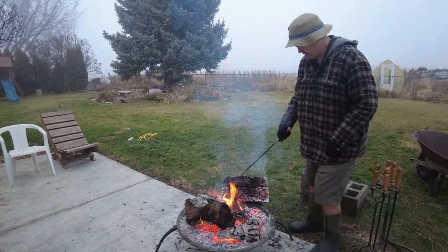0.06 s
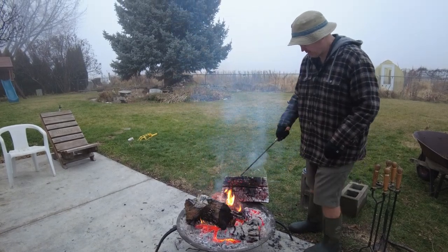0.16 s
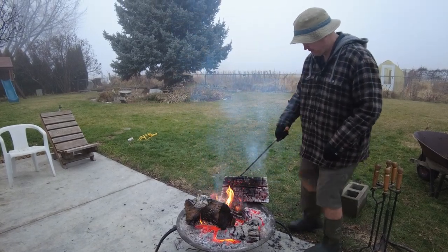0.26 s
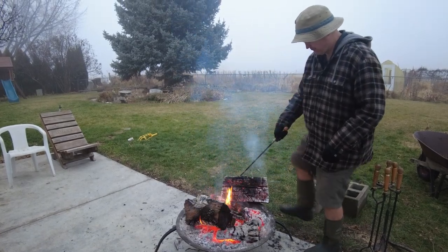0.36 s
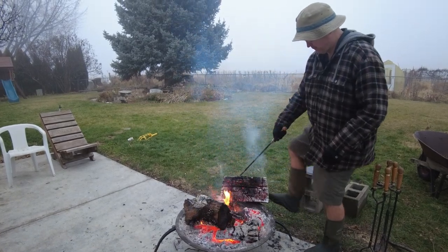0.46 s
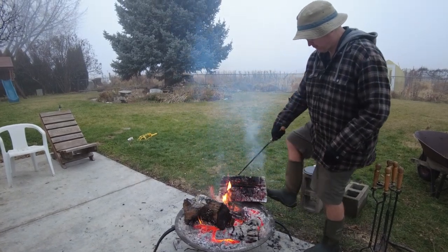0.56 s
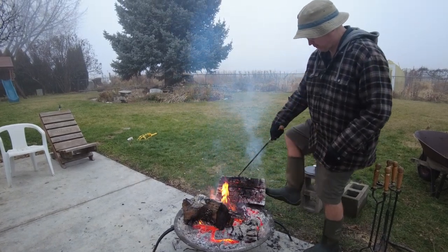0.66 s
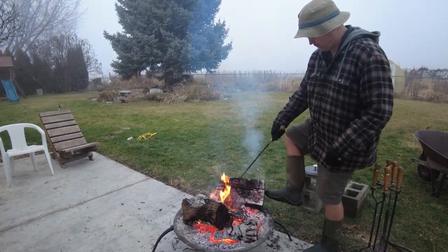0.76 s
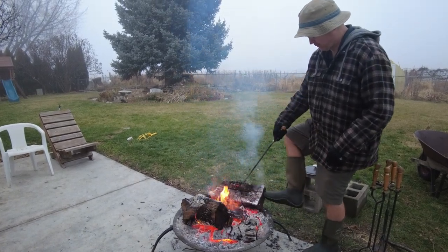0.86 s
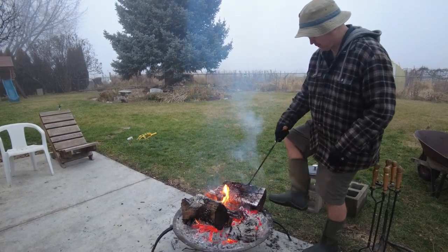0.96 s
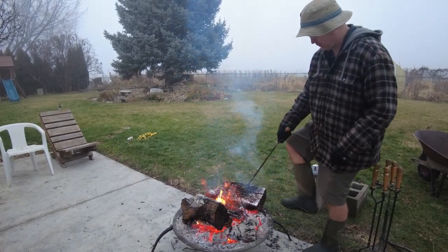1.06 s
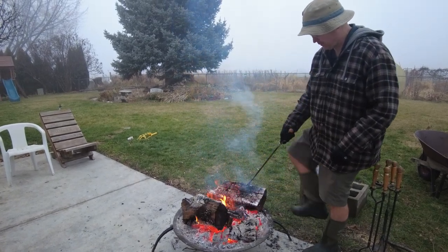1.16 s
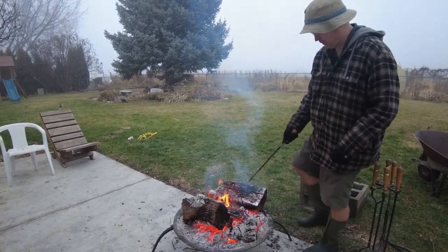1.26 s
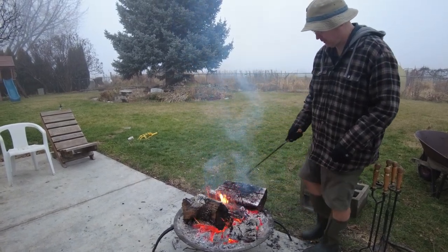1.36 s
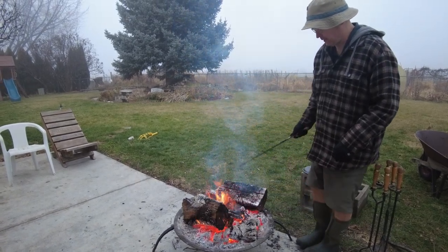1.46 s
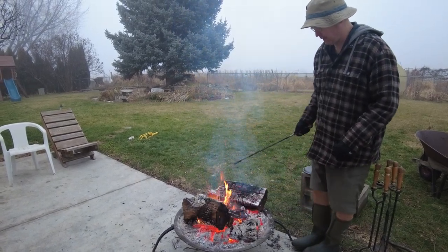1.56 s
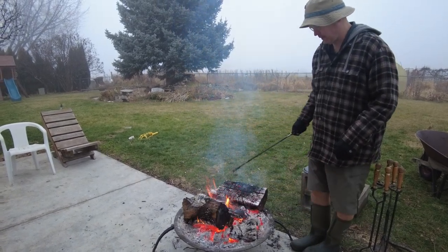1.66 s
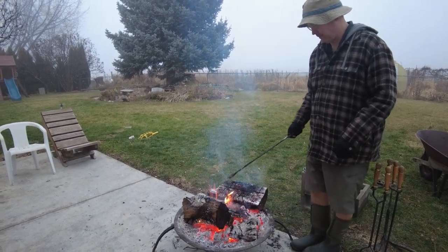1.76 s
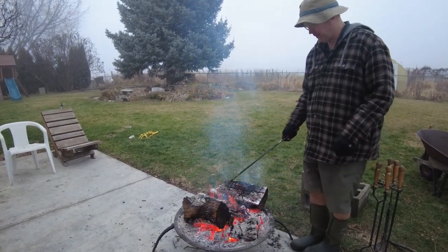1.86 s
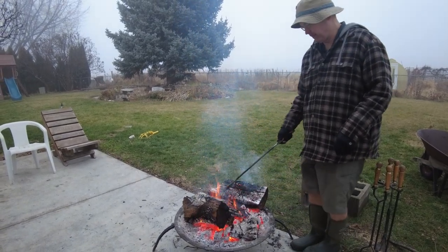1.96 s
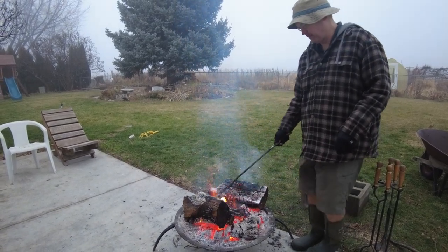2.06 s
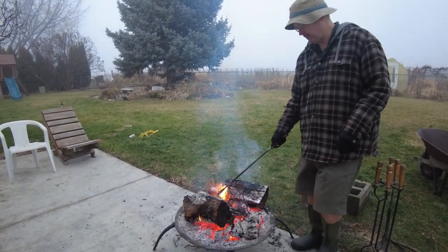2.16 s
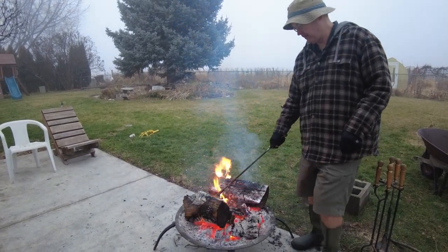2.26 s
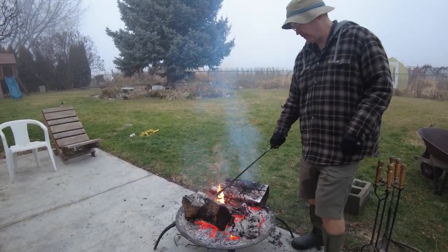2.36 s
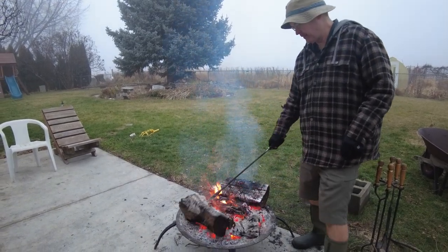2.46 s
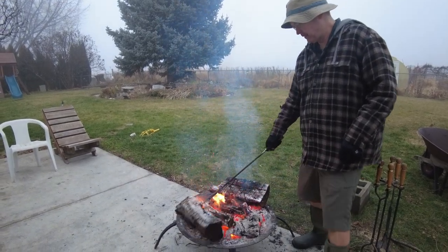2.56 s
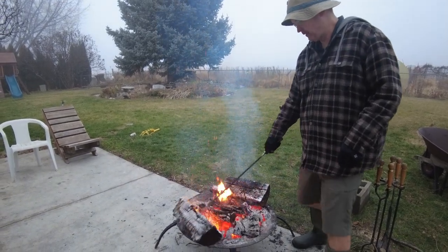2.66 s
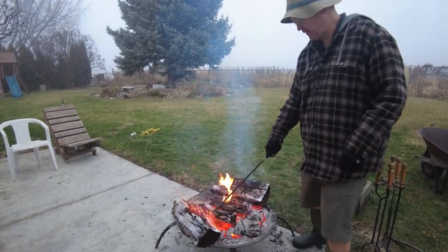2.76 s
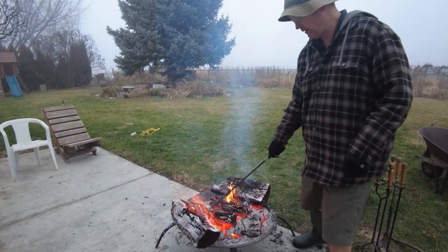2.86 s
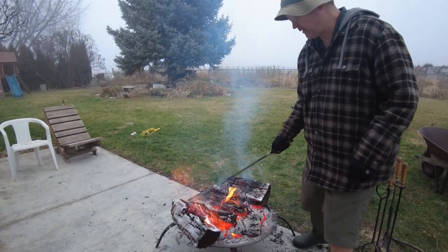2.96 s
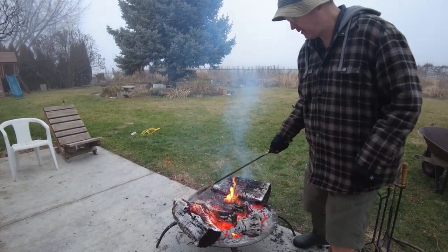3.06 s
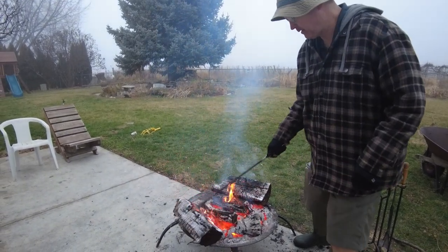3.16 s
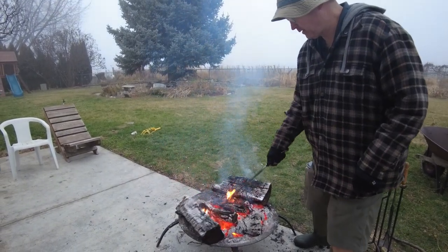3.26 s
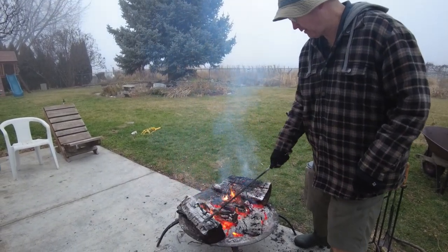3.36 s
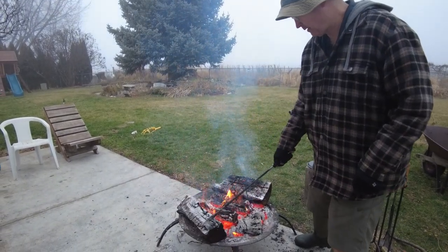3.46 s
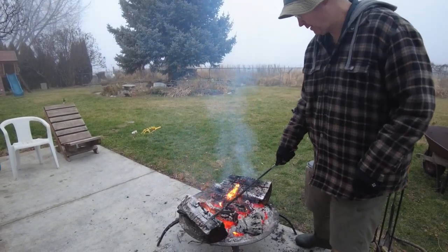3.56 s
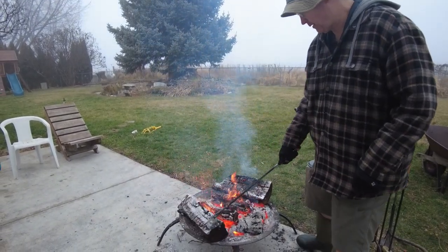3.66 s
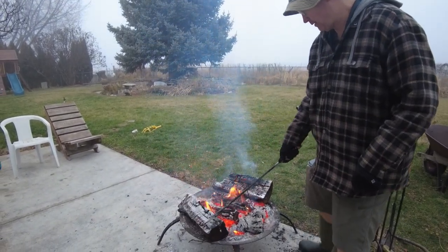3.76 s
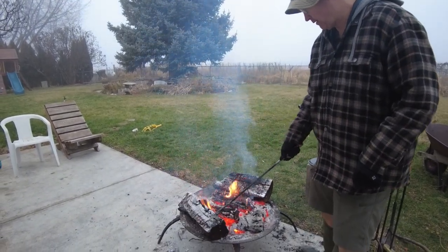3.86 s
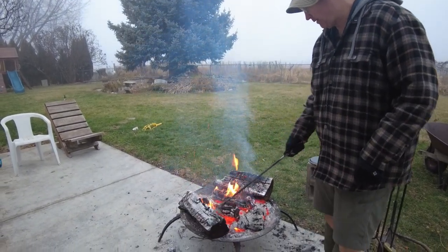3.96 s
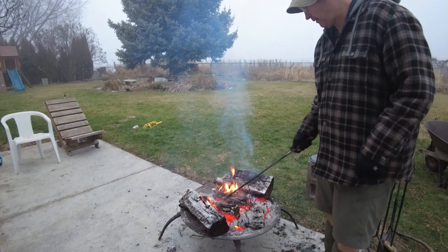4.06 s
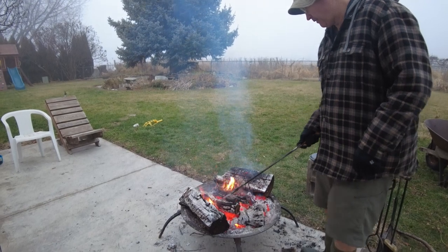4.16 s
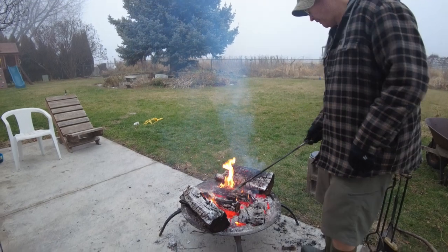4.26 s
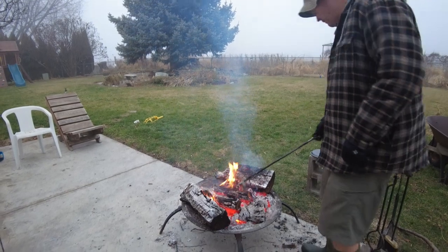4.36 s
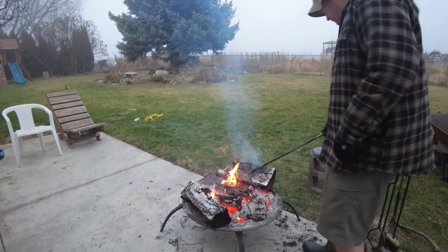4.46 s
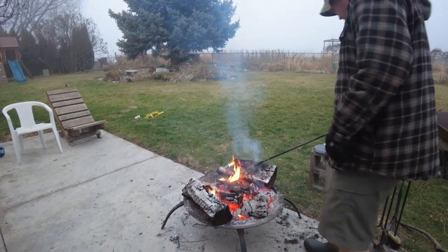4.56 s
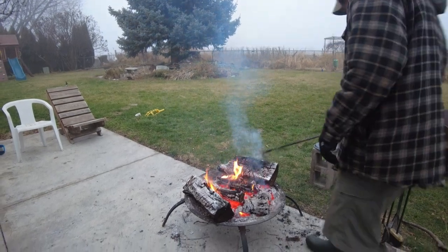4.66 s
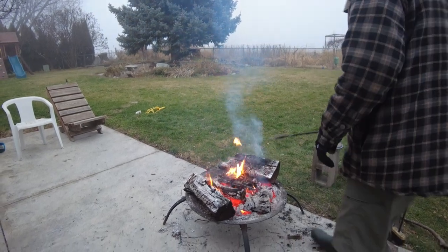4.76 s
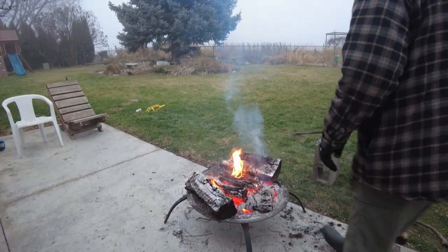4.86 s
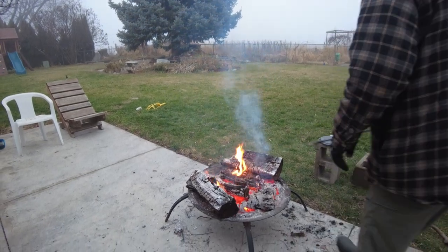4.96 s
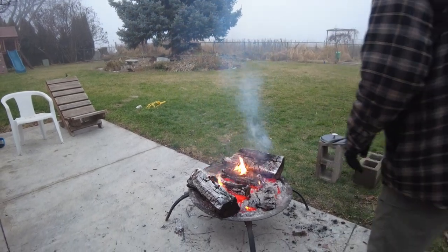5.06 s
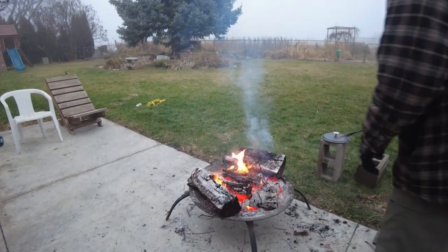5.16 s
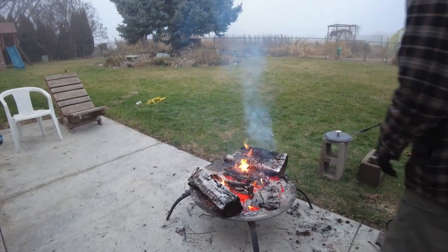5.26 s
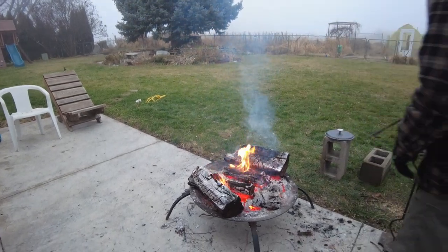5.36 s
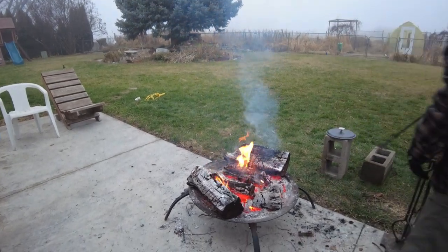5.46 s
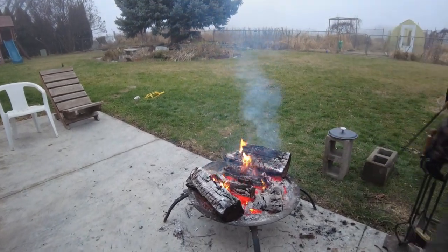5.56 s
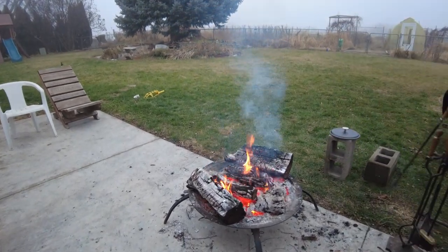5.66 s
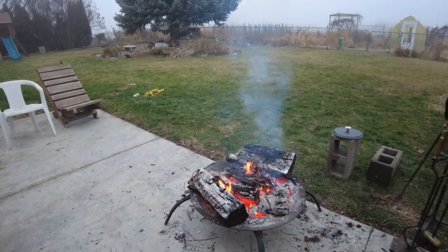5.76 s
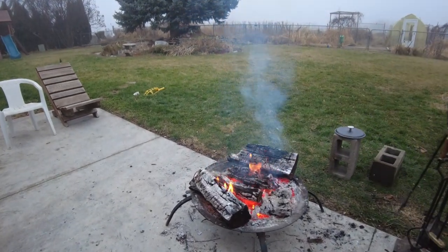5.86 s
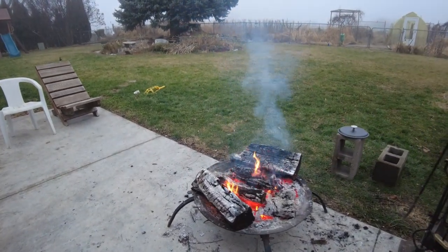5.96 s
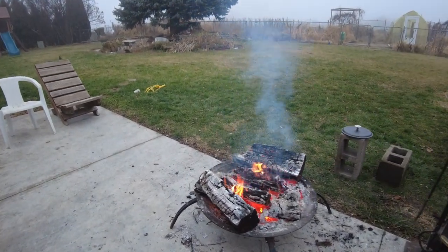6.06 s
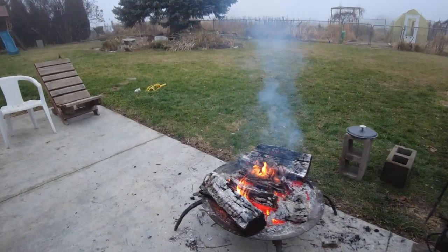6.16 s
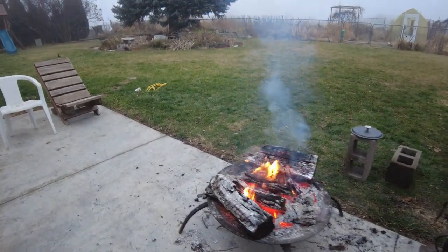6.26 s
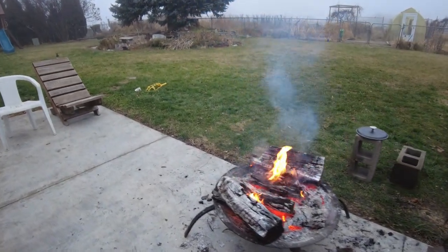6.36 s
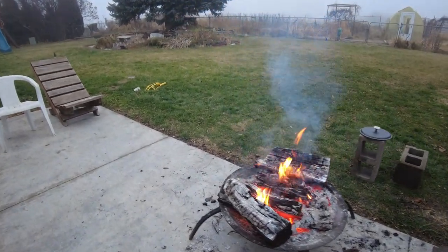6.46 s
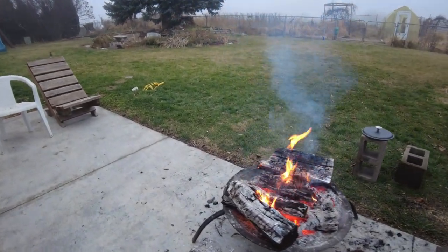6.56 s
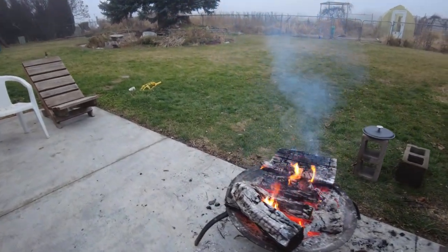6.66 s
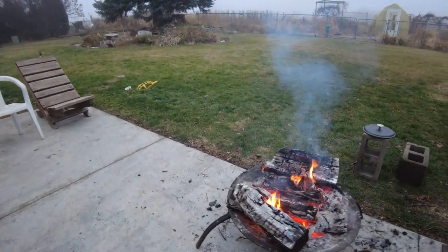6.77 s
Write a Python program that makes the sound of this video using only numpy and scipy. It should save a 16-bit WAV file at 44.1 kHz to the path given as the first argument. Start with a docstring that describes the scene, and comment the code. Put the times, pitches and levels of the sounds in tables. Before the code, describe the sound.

Logs are shifted in a steel fire pit, clanking loudly twice amid crunching charcoal, sharp snaps and faint wind.

```python
"""A steel fire bowl on a patio clanks under two heavy drops as tongs and a boot rearrange burning logs.
Each impact excites the damped modes of bowl and grate; the tongs ring with a slow beat.
Dragged charcoal scrapes and crunches by friction and brittle fracture, and breaks in sharp snaps.
Logs and boots land with low thuds. Wind and flame rumble under a soft hiss; clothing rustles briefly."""
import sys
import numpy as np
from scipy import signal
from scipy.io import wavfile

SR = 44100
rng = np.random.default_rng(int(sys.argv[2]) if len(sys.argv) > 2 else 0)


def put_to_file(sound):
    """Save the sound as 16-bit audio at rate SR, in the file named by the first command-line argument."""
    columns = np.atleast_2d(sound).T  # one column per channel
    safe = np.clip(columns, -1, 1)
    whole_steps = np.round(safe * 32767)
    wavfile.write(sys.argv[1], SR, whole_steps.astype(np.int16))


N = 301203

# Coherence of the two channels. Each row: frequency in Hz, left-right correlation.
COHERENCE = [(30, 0.93), (125, 0.98), (500, 0.44), (2000, 0.27), (6000, 0.71), (14000, 0.16)]
# The same for the drops and the tongs. Each row: frequency in Hz, left-right correlation.
IMPACT_COHERENCE = [(250, .9), (500, .85), (1200, .93), (2400, .72), (4800, .55), (12000, .1)]
BOWL_WAVER_DB = 2.5   # loose coals damp each ring unevenly
NOISE_CUTOFF_HZ = 16300


def bowl_clanks(second_drop_s=2):
    """Modal response: impacts ring the bowl's distinct modes; its dense fine modes act as dying noise."""
    # Contacts within the drops. Each row: time in seconds, level in dB, hardness in dB per octave.
    contacts = [(0.9395, 3, -0.5), (0.9433, -0.5, 4), (0.9529, -14, -1.5), (0.967, -16.5, 0),
                (.987, -9, -4.5), (1.091, -34, 4), (2.6686, -13.5, -2.5), (2.672, 2.5, 3.5),
                (2.6738, -5, -3), (2.6763, -4.5, -2), (2.687, -17, -1), (2.708, -11.5, -1)]
    # Modes of bowl and grate. Each row: frequency in Hz, t60 in seconds, gain in dB in drop one and two.
    modes = [(170, 0.18, -34, -42.5), (290, .2, -37.5, -34.5), (546, 0.072, -32.5, -42.5),
             (615, .15, -30, -32), (813, 0.17, -26, -36.5), (898, 0.1, -28.5, -22), (1924, .1, -35, -38.5),
             (490, .14, -22, -33), (730, .14, -23, -33), (780, .12, -19.5, -29), (1305, .065, -25, -15.5),
             (1400, .12, -38, -31), (1530, .15, -30, -29), (1580, .16, -30, -28), (1670, .14, -29, -30),
             (1787, .09, -40, -25), (2587, .13, -33, -33), (3134, .055, -24, -34), (3270, .05, -32, -23),
             (3720, .075, -31, -48), (4400, .25, -48, -58), (2604, .75, -56.5, -62)]
    # Fine modes of sheet steel and charred wood, a fast-dying crack. The columns are those of the modes.
    fine_modes = [(110, 0.23, -43, -49), (220, 0.48, -46.5, -49), (416, 0.032, -27.5, -34.5),
                  (573, 0.077, -16.5, -22), (790, 0.023, -16.5, -32), (1230, 0.015, -35, -22),
                  (1620, 0.093, -26, -30), (2410, 0.03, -38, -23.5), (3396, 0.011, -24, -28.5),
                  (4900, 0.071, -30, -38), (7100, 0.049, -37.5, -38.5), (10175, 0.053, -37.5, -41),
                  (13500, 0.011, -45.5, -38)]
    times, level_db, hardness = np.transpose(contacts)
    drop = (times > second_drop_s).astype(int)
    onsets = np.round(times * SR).astype(int)
    scatter_db = rng.standard_normal((len(times), len(modes)))
    out = np.zeros((2, N))

    def impulses(hz, drop_db, extra_db=0):
        """The contacts as felt at one frequency: harder ones put more energy into the treble."""
        clicks = np.zeros(N)
        tilt_db = hardness * np.log2(hz / 1000)
        clicks[onsets] = from_db(level_db + tilt_db + np.take(drop_db, drop) + extra_db)
        return clicks

    for k, (hz, t60, *drop_db) in enumerate(modes):
        force = impulses(hz, drop_db, scatter_db[:, k]) * (-1) ** k
        tone = resonator(force, hz, t60) * from_db(BOWL_WAVER_DB * drift(40))
        side = quadrature(tone, hz) * (-1) ** (k // 2)   # the modes face different ways
        out += stereo(tone, side, hz, IMPACT_COHERENCE)
    for hz, noise in half_octave_noise(lowest_hz=90, octaves=7.5):
        t60, *drop_db = (at_hz(fine_modes, hz, column) for column in (1, 2, 3))
        envelope = decay(impulses(hz, drop_db), t60)
        out += envelope * stereo(*rms_one(noise), hz, IMPACT_COHERENCE)
    return out


def tong_ring(struck_s=0.9435, blow_db=-23, t60=0.26, waver_db=4):
    """Beating: one blow rings two slightly mistuned arms, which slip out of phase."""
    # The natural frequency of each arm in Hz.
    arms_hz = [2885.2, 2891.4]
    blow = impulse(struck_s, blow_db)
    tone = sum(resonator(blow, hz, t60) for hz in arms_hz)
    tone *= from_db(waver_db * drift(26))   # the grip shifts and damps the ring unevenly
    return stereo(tone, quadrature(tone, arms_hz[0]), arms_hz[0], IMPACT_COHERENCE)


def bar_touches():
    """Free vibration: a light touch leaves one bar of the grate or tongs ringing in a single mode."""
    # Each row: time in seconds, impulse level in dB, frequency in Hz, t60 in seconds.
    touches = [(1.372, -60, 1302, 0.24), (2.03, -56.5, 879, 0.31), (3.02, -73, 2620, .5),
               (5.24, -70, 2700, .4)]
    return sum(resonator(impulse(start, level_db), hz, t60) * from_db(BOWL_WAVER_DB * drift(20))
               for start, level_db, hz, t60 in touches)


def charcoal_scrapes(grains_per_s=800, grain_spread_db=3.5, smooth_friction=1.4):
    """Friction and brittle fracture: grainy noise is coloured by resonances of wood, hollow and shaft."""
    # Drags of charcoal, boot and tongs. Each row: start, rise, hold and nominal trail t60 in seconds,
    # crunch level in dB, wood body and ash fizz in dB over crunch, body and hollow pitch in Hz.
    strokes = [(0.182, 0.01, 0.029, 0.26, -48.5, 2.5, 0.5, 706, 1680),
               (0.247, 0.0091, 0.057, 0.45, -56, -0.5, -4.5, 720, 1630),
               (0.335, 0.035, 0.021, 0.33, -56.5, 4.5, -8, 736, 1880),
               (0.445, 0.0085, 0.023, 0.09, -63.5, -3, -8, 750, 1800),
               (0.589, 0.012, 0.018, 0.32, -55.5, 9, -9, 505, 1680),
               (0.638, 0.04, 0.041, 0.12, -51.5, 6.5, -9, 525, 1600),
               (0.732, 0.017, 0.0057, 0.02, -44.5, 6, -3.5, 507, 1600),
               (0.748, 0.0092, 0.0099, 0.45, -59, 18.5, -10, 474.2, 1608),
               (0.902, 0.025, 0.013, 0.21, -51, 5.5, -10, 760, 1506),
               (0.935, 0.0062, 0.032, 0.48, -39, 6, -1, 593, 1592),
               (1.349, 0.01, 0.016, 0.12, -64, -3.5, -12.5, 1280, 2600),
               (1.57, 0.015, 0.053, 0.1, -75, 13, -9, 709, 1507),
               (1.991, 0.0078, 0.053, 1, -70, 8, -10.5, 831, 1450),
               (2.231, 0.008, 0.048, 0.074, -59.5, -2.5, -2, 1314, 2800),
               (2.41, 0.13, 0.029, 0.5, -49.5, -8.5, 1.5, 850, 1640),
               (2.581, 0.088, 0.078, 0.54, -49, 3, -10.5, 1115, 1517),
               (2.775, 0.056, 0.0071, 0.18, -53, -13, 4, 1310, 2650),
               (2.872, 0.022, 0.062, 0.51, -69, -15.5, 7, 719, 1930),
               (3.355, 0.013, 0.022, 1, -55, 3, -5, 760, 1460),
               (3.457, 0.021, 0.0094, 0.37, -67, 13.5, 11, 625, 1500),
               (3.496, 0.12, 0.02, 0.41, -64.5, 8, 5, 567, 2550),
               (3.618, 0.072, 0.042, 0.048, -59, -3.5, 7, 587, 3020),
               (3.814, 0.026, 0.012, 0.43, -56.5, -17, 9, 1250, 2900),
               (4.009, 0.0095, 0.016, 0.057, -41.5, -7.5, -10, 808, 1300),
               (4.043, 0.009, 0.11, 0.39, -57.5, -7, -7, 759, 1413),
               (5.919, 0.03, 0.073, 0.3, -61.5, 3.5, -5.5, 2870, 3700),
               (6.612, 0.0073, 0.015, 0.2, -67.5, 6, -13.5, 1380, 1700)]
    body_ratio, hollow_ratio = 1.23, 1.22   # from centre frequency to either band edge
    hollow_db, shaft_db = -3, -6   # relative to crunch and to fizz
    fractures = rng.random(N) < grains_per_s * from_db(3 * drift(40)) / SR   # grains come in clumps
    grains = fractures * from_db(grain_spread_db * np.minimum(rng.exponential(1, N), 5))
    roughness = smooth_friction + rms_one(decay(grains, t60=0.0049))
    friction = roughness * rng.standard_normal((2, N))
    resonances, crunch, fizz = np.zeros((2, N)), np.zeros(N), np.zeros(N)
    for start, *shape, body_hz, hollow_hz in strokes:
        body_gain, crunch_gain, fizz_gain = stroke_envelopes(start, *shape)
        onset = round(start * SR)
        span = slice(onset, onset + len(body_gain))
        body = rms_one(band(friction[:, span], body_hz / body_ratio, body_hz * body_ratio))
        hollow = rms_one(band(friction[:, span], hollow_hz / hollow_ratio, hollow_hz * hollow_ratio))
        resonances[:, span] += body_gain * body + crunch_gain * from_db(hollow_db) * hollow
        crunch[span] += crunch_gain
        fizz[span] += fizz_gain
    shaft = from_db(shaft_db) * fizz * shaft_ring(friction[0])
    return three_bands(0, crunch, fizz, friction) + stereo(*resonances, hz=340) + shaft


def stroke_envelopes(start, rise, hold, t60, level_db, body_db, fizz_db):
    """Body, crunch and fizz of one drag swell quadratically, hold, then decay exponentially."""
    # Factors on the stroke's t60 for body, crunch and fizz.
    trail_factors = [0.34, 0.9, 0.54]
    age = np.arange(min(SR, N - round(start * SR))) / SR
    swell = np.minimum(age / rise, 1) ** 2
    trail_db = -60 * np.maximum(age - rise - hold, 0) / (t60 * np.c_[trail_factors])
    return swell * from_db(level_db + np.c_[[body_db, 0, fizz_db]] + np.maximum(trail_db, -120))


def shaft_ring(friction, t60=0.018, waver_db=4):
    """Forced vibration: friction drives the bending modes of the tongs' steel shaft."""
    return rms_one(sum(resonator(friction, hz, t60) * from_db(waver_db * drift(8))
                       for hz in np.geomspace(2750, 13600, 14)))


def charcoal_snaps(rise_s=0.00048, spike_height=3.05, spike_s=0.00047, woody_db=3.5):
    """Brittle fracture: each break is a spike of noise with a tail whose treble is damped first."""
    # Each row: time in seconds, base level in dB, extra gain of wood body and of treble in dB.
    snaps = [(0.2012, -31.5, -10.5, -14), (0.219, -31, -13, -33), (0.2604, -37.5, -2.5, -31),
             (0.311, -42, -7.5, -24), (0.4545, -53, -3.5, -27), (0.749, -47.5, 3, -23),
             (0.893, -43.5, -34, -28), (1.198, -56, -6.5, -2), (1.361, -49.5, -19, -25.5),
             (1.7111, -49, 0.5, -18), (2.146, -59, -6, 0.5), (2.239, -43.5, -13, -10.5),
             (2.25, -50, -13, -2.5), (2.3217, -53, -28, 0), (2.4016, -48.5, -5, -8.5),
             (2.514, -31, -15.5, -27), (2.5196, -32, -7.5, -20), (2.5623, -36, -14, -27),
             (2.836, -33, -17, -17), (2.915, -48, -15, -3), (3.1922, -52, -22.5, -3),
             (3.215, -50.5, -18, -3.5), (3.2518, -47, -21.5, -16.5), (3.367, -33.5, -0.5, -2.5),
             (3.6556, -42, -18.5, -3), (3.6965, -42, -17, 1.5), (3.838, -41.5, -19, -3),
             (4.06, -31.5, -11.5, -12), (4.1103, -34, -10, -13), (4.1582, -35.5, -39, -8.5),
             (4.2143, -52.5, -37.5, -14), (4.2304, -47, -43, -10.5), (4.543, -51, -2.5, -25.5),
             (4.56, -64, 2.5, -12.5), (4.6138, -59.5, -2, 3.5), (4.677, -41, -19, -22),
             (5.105, -68, 7, -18), (5.3545, -41.5, -13, -7.5), (6.2467, -58.5, 7.5, -10),
             (6.619, -54.5, -26, -6)]
    offset_db, t60 = np.c_[[1, -7, 1]], np.c_[[0.07, 0.035, 0.022]]   # body, crunch, treble
    age = np.arange(round(0.15 * SR)) / SR
    tail = from_db(-60 * age / t60) * (1 - np.exp(-age / rise_s))
    burst = tail + spike_height * np.exp(-age / spike_s)
    envelopes = np.zeros((3, N))
    for start, level_db, body_db, treble_db in snaps:
        onset = round(start * SR)
        gains = from_db(level_db + offset_db + np.c_[[body_db, 0, treble_db]])
        envelopes[:, onset:onset + len(age)] += gains * burst
    white = rng.standard_normal((2, N))
    woody_noise = white + from_db(woody_db) * band(white, 1200, 3100)
    return three_bands(*envelopes, woody_noise)


def thuds(puff_db=-9, rise_s=0.00014):
    """Damped oscillation: a landing log or boot rings one low wood mode, with a dull puff of noise."""
    # Each row: time in seconds, level in dB, frequency in Hz, t60 in seconds.
    landings = [(0.205, -31.5, 265, 0.09), (0.219, -31.5, 272, 0.1), (0.591, -34, 110, 0.17),
                (0.934, -26, 95, 0.17), (0.99, -26.5, 179, 0.07), (1.618, -42.5, 252, 0.093),
                (1.709, -31, 194, 0.038), (2.296, -38.5, 88, 0.13), (2.671, -25.5, 314, 0.062),
                (2.74, -36, 231, 0.24), (3.366, -22, 123, 0.075), (3.385, -27, 206.6, 0.15),
                (4.025, -33.5, 87, 0.14), (4.613, -35, 102.5, 0.1), (5.575, -40, 102.2, 0.13),
                (5.635, -35, 64.5, 0.11)]
    out = np.zeros(N)
    age = np.arange(round(0.4 * SR)) / SR
    for start, level_db, hz, t60 in landings:
        tone = np.sin(2 * np.pi * hz * age)
        puff = rms_one(band(rng.standard_normal(len(age)), hz * 0.22, hz * 2.5))
        envelope = from_db(level_db - 60 * age / t60) * (1 - np.exp(-age / rise_s))
        onset = round(start * SR)
        out[onset:onset + len(age)] += envelope * (tone + from_db(puff_db) * puff)
    return out


def wind_flame_and_rustle(flicker_db=1.9, crossovers_hz=(200, 2500)):
    """Broadband noise: wind, flame and a brief rustle of clothing near 5.5 s, in three ranges."""
    # Each row: time in seconds, levels of rumble, murmur and hiss in dB.
    levels = [(0, -52.5, -67.5, -73), (2, -52, -64.5, -71), (4.398, -53.5, -68, -71.5),
              (5.3, -56, -67.5, -71), (5.55, -52, -57.5, -62.5), (5.851, -51, -62, -69.5),
              (6.83, -55, -60, -65.5)]
    # Spectral shape within those ranges. Each row: frequency in Hz, relative density in dB.
    spectrum = [(12, -31), (20, -4), (44, -5.5), (91, -10.5), (127, -18), (397, -29.5), (1040, -35.5),
                (1150, -37.5), (1480, -34), (2720, -43), (8500, -52), (11000, -73)]
    layers = np.zeros((3, 2, N))
    for hz, noise in half_octave_noise(lowest_hz=18, octaves=9.5):
        layer = np.searchsorted(crossovers_hz, hz)
        wobble_db = flicker_db * drift(22) * (layer > 0)
        layers[layer] += from_db(at_hz(spectrum, hz) + wobble_db) * stereo(*noise, hz)
    times, *curves_db = np.transpose(levels)
    return sum(from_db(np.interp(np.arange(N) / SR, times, curve_db)) * rms_one(noise)
               for curve_db, noise in zip(curves_db, layers))


def microphone_hiss():
    """Self-noise: the microphones add a steady hiss that rises towards the top."""
    # Each row: centre frequency in Hz, band level in dB.
    hiss_bands = [(6000, -81.5), (9000, -78.5), (12000, -78.5), (15000, -74)]
    white = rng.standard_normal((2, 2, N))
    return sum(from_db(level_db) * stereo(*rms_one(band(white[k % 2], hz - 1500, hz + 1500)), hz)
               for k, (hz, level_db) in enumerate(hiss_bands))


def three_bands(body, crunch, treble, noise):
    """Amplitude modulation: three ranges of a mid-side noise each follow their own envelope."""
    ranges_hz = [(400, 1035), (1100, 6350), (3900, 13830)]
    return sum(envelope * stereo(*rms_one(band(noise, low, high)), np.sqrt(low * high))
               for envelope, (low, high) in zip((body, crunch, treble), ranges_hz))


def half_octave_noise(lowest_hz, octaves):
    """Filter bank: yields the centre frequency and mid-side noise of each half octave."""
    edges = lowest_hz * 2 ** np.arange(0, octaves + 0.1, 0.5)
    white = rng.standard_normal((2, 2, N))
    for k, (low, high) in enumerate(zip(edges, edges[1:])):
        yield np.sqrt(low * high), band(white[k % 2], low, high)


def impulse(time_s, level_db):
    """An ideal blow, one sample long."""
    return from_db(level_db) * (np.arange(N) == round(time_s * SR))


def resonator(force, hz, t60):
    """Damped oscillator: a unit impulse starts a decaying sine of amplitude 1."""
    radius = np.exp(-np.log(1000) / (t60 * SR))
    angle = 2 * np.pi * hz / SR
    return signal.lfilter([0, np.sin(angle)], [1, -2 * radius * np.cos(angle), radius ** 2], force + 1e-18)


def decay(clicks, t60):
    """Leaky integration: an envelope that jumps at each click and falls exponentially."""
    return signal.lfilter([1], [1, -np.exp(-np.log(1000) / (t60 * SR))], clicks + 1e-18)


def drift(rate_hz):
    """Low-passed noise: a slow random fluctuation of unit rms."""
    hop, settle = 40, 2000
    pole = np.exp(-2 * np.pi * hop * rate_hz / SR)
    white = rng.standard_normal(N // hop + settle + 2)
    slow = signal.lfilter([1], [1, -2 * pole, pole ** 2], white)[settle:]
    return np.interp(np.arange(N) / hop, np.arange(len(slow)), rms_one(slow))


def stereo(mid, side, hz, coherence=COHERENCE):
    """Mid-side mixing: the coherence at this frequency sets how alike left and right are."""
    alike = at_hz(coherence, hz)
    return np.sqrt((1 + alike) / 2) * mid + np.sqrt((1 - alike) / 2) * side * [[1], [-1]]


def quadrature(tone, hz):
    """The tone shifted by a quarter period."""
    return np.roll(tone, round(SR / hz / 4))


def band(x, low_hz, high_hz):
    """Band-pass filter."""
    return signal.sosfilt(signal.butter(2, [low_hz, high_hz], "band", fs=SR, output="sos"), x)


def low_pass(x, stop_hz):
    """Steep low-pass filter."""
    return signal.sosfilt(signal.cheby2(20, 60, stop_hz, fs=SR, output="sos"), x)


def at_hz(table, hz, column=1):
    """Interpolate a table on a log-frequency axis."""
    columns = np.transpose(table)
    return np.interp(np.log(hz), np.log(columns[0]), columns[column])


def from_db(db):
    """Amplitude ratio of a level."""
    return 10 ** (np.asarray(db) / 20)


def rms_one(x):
    """Scale to unit rms."""
    return x / np.sqrt(np.mean(x ** 2) + 1e-20)


def scene():
    """Superposition: the impacts add to band-limited scraping, wind, flame and rustle."""
    impacts = bowl_clanks() + tong_ring() + bar_touches() + charcoal_snaps() + thuds()
    return impacts + low_pass(charcoal_scrapes() + wind_flame_and_rustle(), NOISE_CUTOFF_HZ)


def record(dry):
    """Soft saturation: microphone hiss is added, peaks are rounded and the top is cut."""
    ceiling = 0.82
    picked_up = dry + low_pass(microphone_hiss(), NOISE_CUTOFF_HZ)
    return low_pass(ceiling * np.tanh(picked_up / ceiling), stop_hz=17000)


dry = scene()
out = record(dry)
put_to_file(out)
```